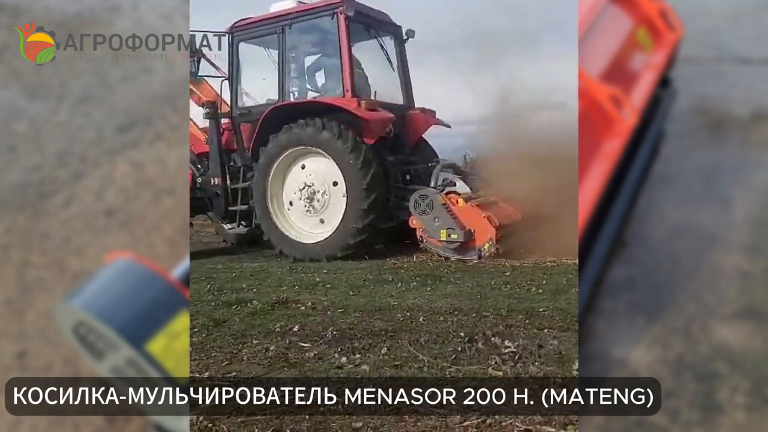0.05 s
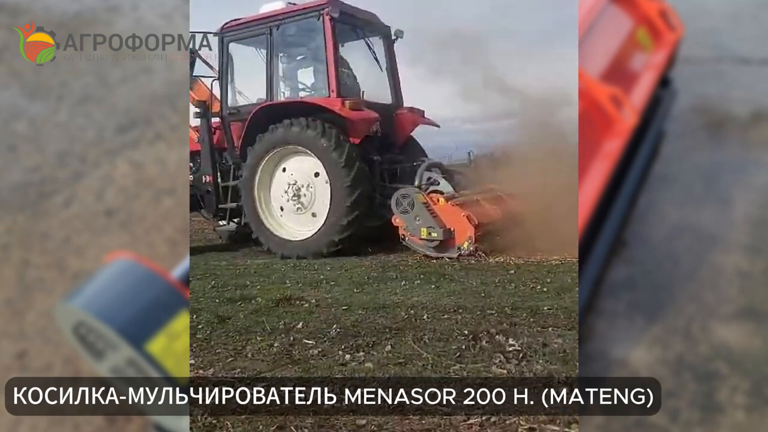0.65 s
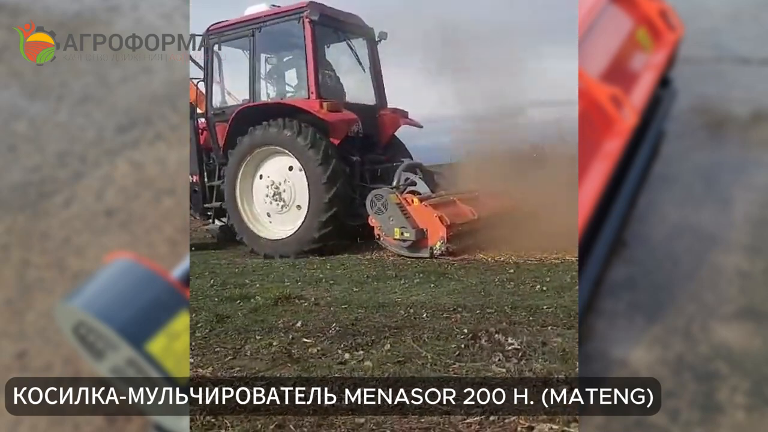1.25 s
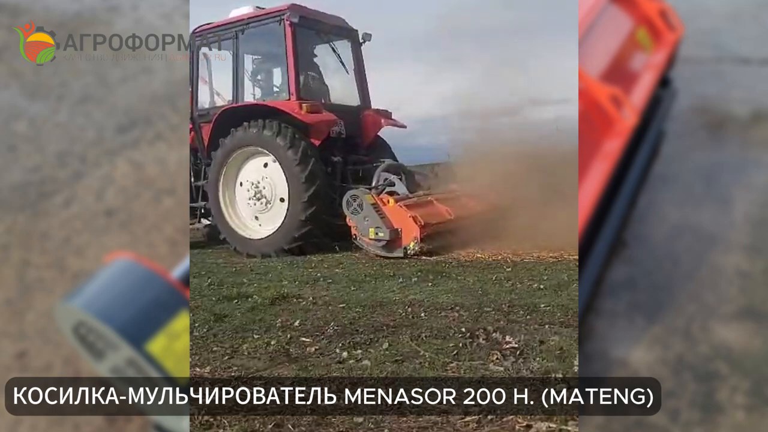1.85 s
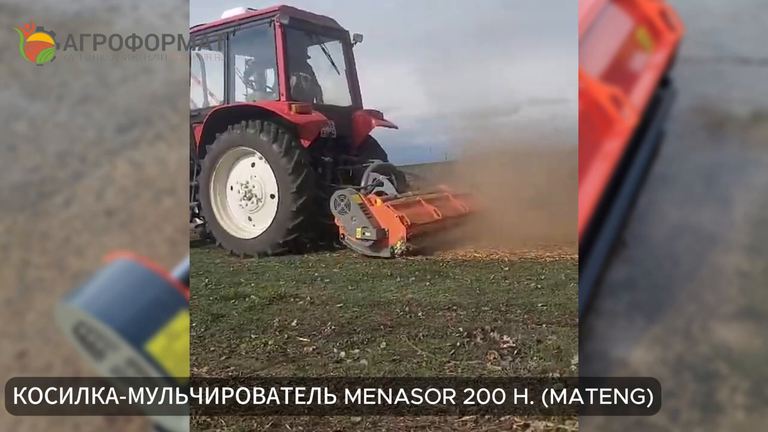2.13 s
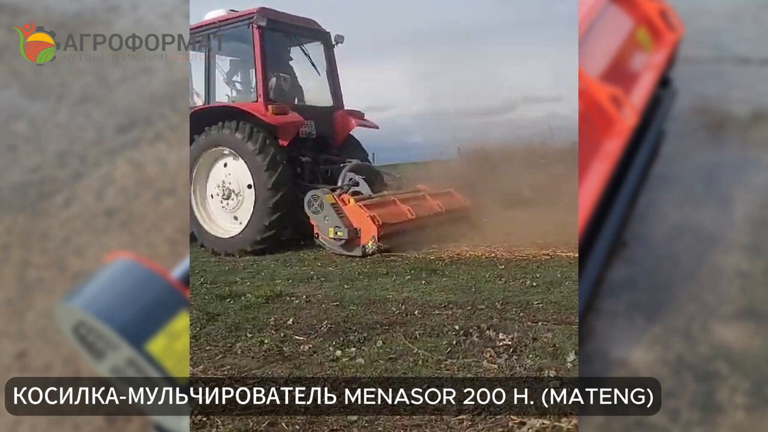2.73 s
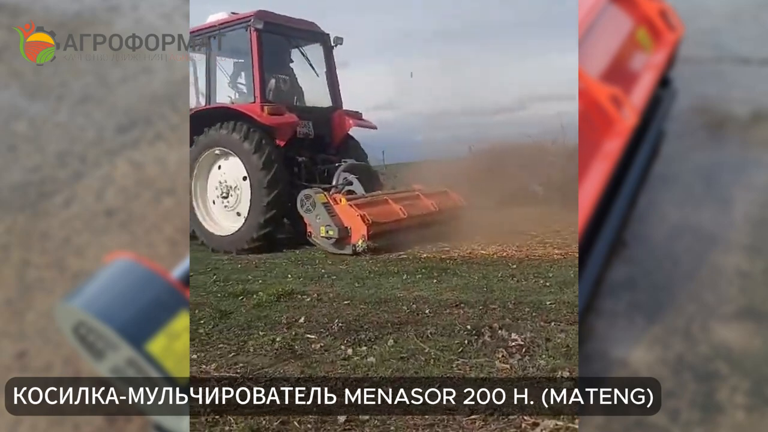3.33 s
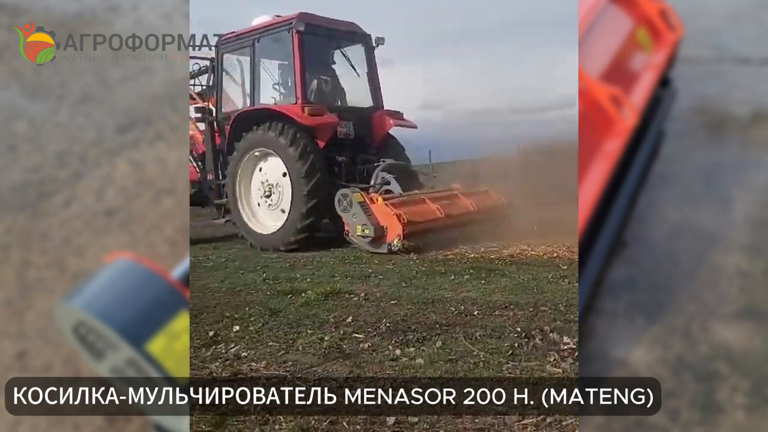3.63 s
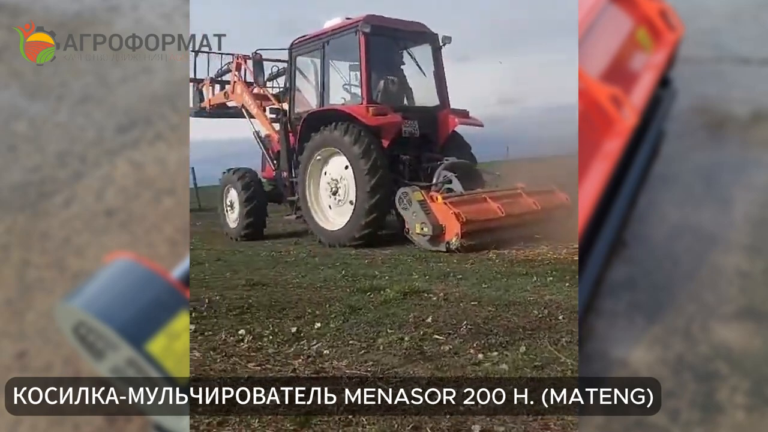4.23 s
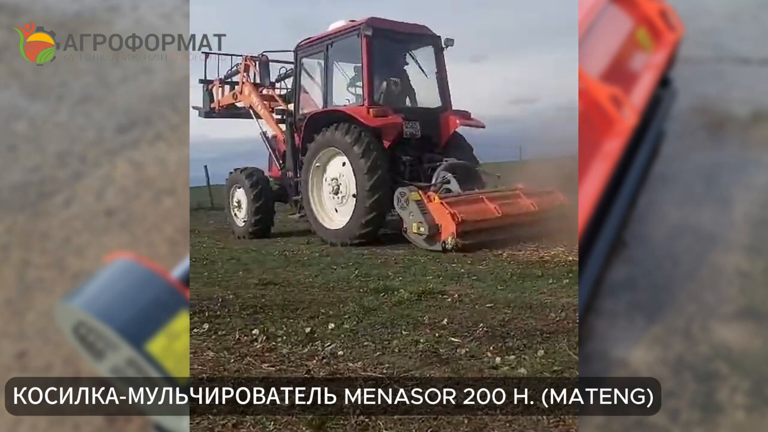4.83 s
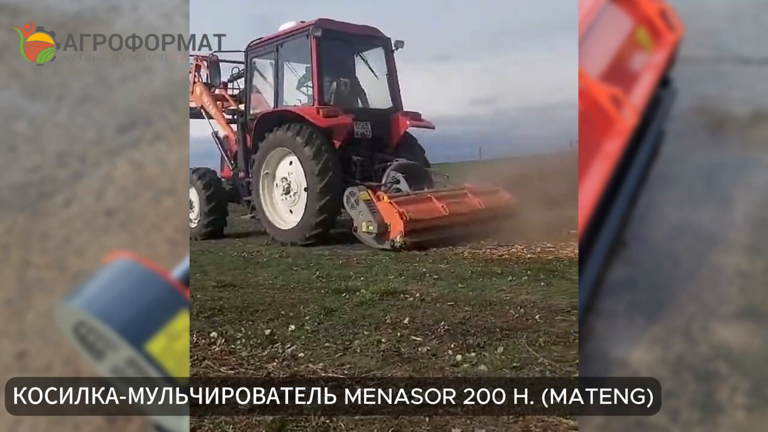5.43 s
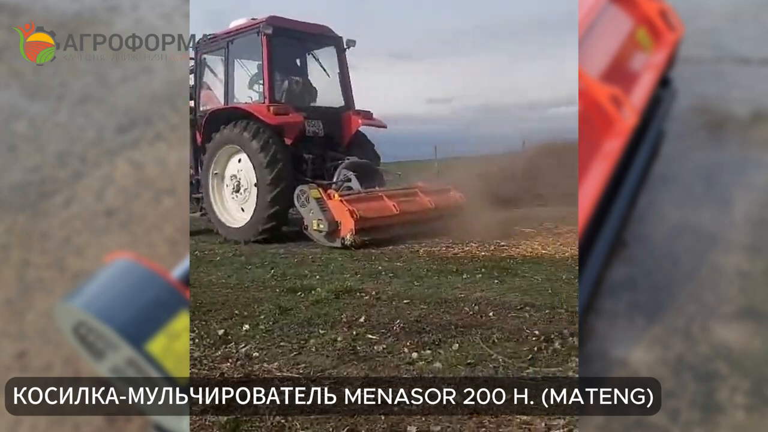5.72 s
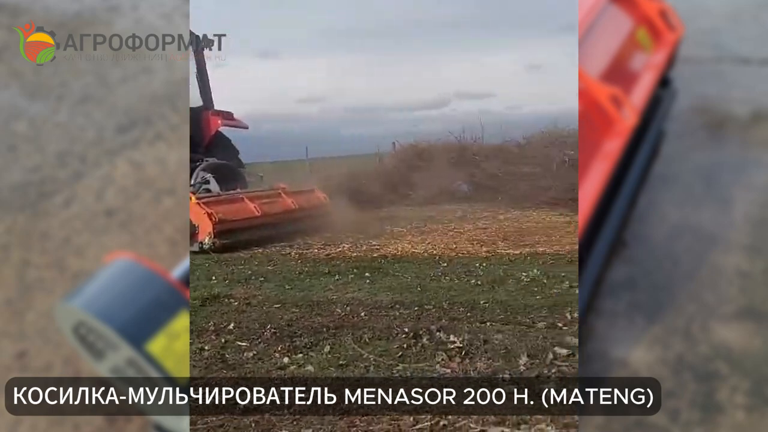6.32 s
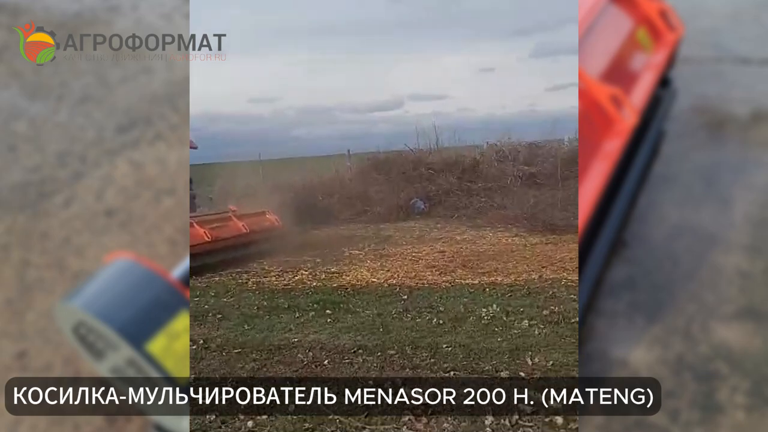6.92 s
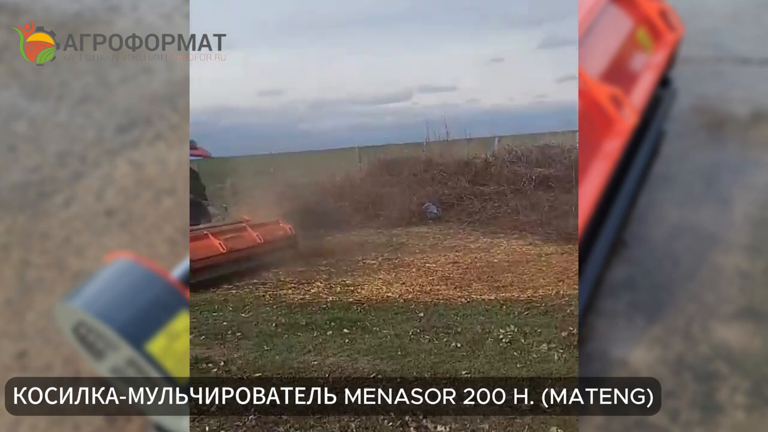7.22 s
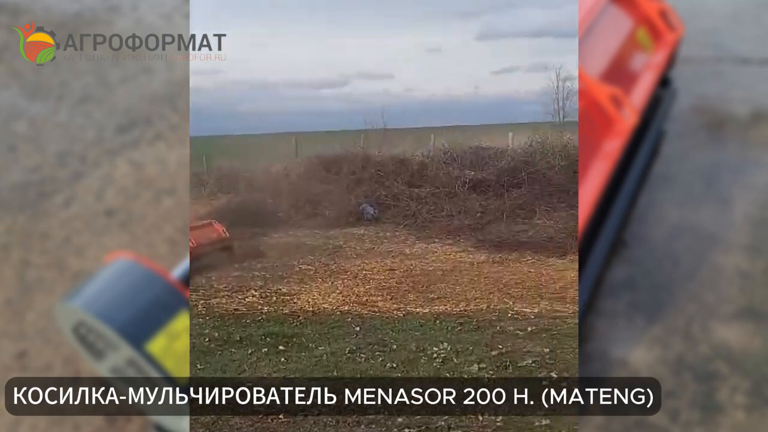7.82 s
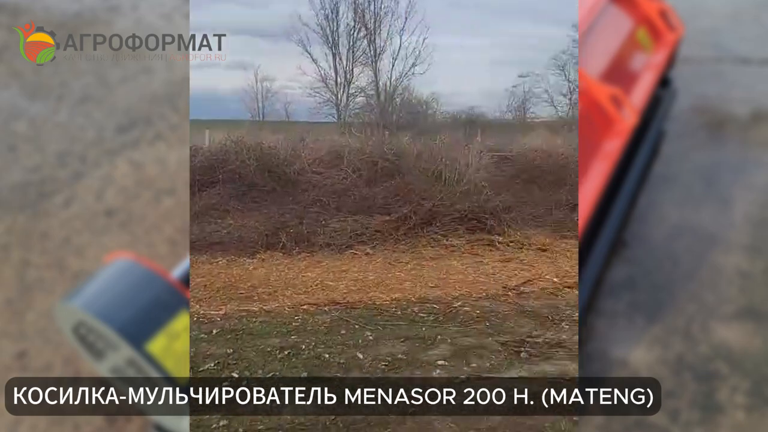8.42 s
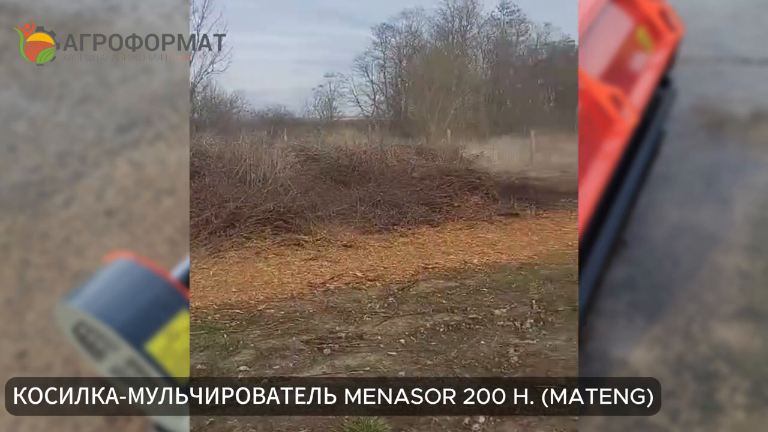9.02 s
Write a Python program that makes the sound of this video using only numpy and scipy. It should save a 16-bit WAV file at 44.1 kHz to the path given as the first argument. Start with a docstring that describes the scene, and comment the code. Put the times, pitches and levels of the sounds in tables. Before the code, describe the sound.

A diesel tractor drones while its mulcher roars and crunches through branches, with snapping sticks and gusty wind on the microphone.

```python
"""An open field, where a diesel tractor creeps past with a flail mulcher behind it.
The exhaust drones and the engine clatters. The mulcher's rotor, a spinning drum of small hammers
called flails, roars and hums; its hum and the drone are so close in pitch that they slowly throb.
Branches crunch against the steel hood, sticks snap and chips spray out, until the brush runs out.
Wind buffets the microphone, which hears through two openings, the left and right ports."""
import sys
import numpy as np
from scipy import signal
from scipy.fft import rfft, irfft, next_fast_len
from scipy.io import wavfile
from scipy.ndimage import uniform_filter1d

SR = 44100
rng = np.random.default_rng(int(sys.argv[2]) if len(sys.argv) > 2 else 0)


def master(y):
    """Save y as 16-bit WAV."""
    cut = np.clip(np.atleast_2d(y).T, -1, 1)
    pcm = np.round(cut * 32767)  # scale
    wavfile.write(sys.argv[1], SR, pcm.astype(np.int16))


N = 399546
TIME = np.arange(N) / SR
FFT_SIZE = 2 * next_fast_len(N // 2 + SR // 10)
BIN_HZ = np.fft.rfftfreq(FFT_SIZE, 1 / SR)

# how loud the passing machine drones: (time [s], level [dB])
DRONE_LEVELS = [(0.2, -35), (3.01, -39), (5.27, -31), (8.2, -29.5), (8.7, -32)]
# the rotor bites into tufts of brush: (start [s], length [s], chip spray [dB], twig crackle [dB])
BRUSH_BITES = [(0, 0.88, -50, -43), (0.844, 0.27, -40, -43.5), (1.273, 0.55, -43.5, -40.5),
               (2.24, 0.5, -41, -41), (3.015, 0.086, -50.5, -40), (3.499, 0.25, -41.5, -45),
               (4.172, 0.093, -49, -47.5), (4.598, 0.11, -40, -48.5), (4.86, 0.52, -44, -50),
               (5.754, 0.5, -51, -69), (6.942, 0.43, -59, -72), (8.048, 0.077, -63, -83)]
# branches breaking: (time [s], peak [dB], note of the wood [Hz], hood thud added to the peak [dB])
BRANCH_BREAKS = [(0.08, -28.5, 1910, -4), (0.19, -27.5, 1886, -6), (0.3428, -30.5, 1945, -28),
                 (0.924, -30, 2110, -11), (1.073, -25.5, 1800, -4), (1.468, -29, 1740, -10),
                 (1.5318, -25, 2150, -6), (1.5914, -26, 1980, 6), (1.7561, -26, 1863, -8),
                 (1.894, -28.5, 2070, 6.5), (2.1365, -28, 1940, -7), (2.172, -26.5, 1900, 3),
                 (2.2378, -22, 1647, 3), (2.2597, -17.5, 2100, 5), (2.287, -24.5, 1766, -6),
                 (2.5122, -22, 1790, 1), (2.6253, -29, 1940, 7.5), (2.711, -23, 1970, -10),
                 (2.8712, -31.5, 2060, -9), (3.5379, -16, 1730, 0.5), (3.6088, -22.5, 2020, -15),
                 (3.633, -20, 1740, 5.5), (4.0248, -22.5, 2000, -29), (4.6652, -36, 2050, 0),
                 (4.742, -23.5, 2020, -14), (4.9054, -25.5, 1470, -6), (5.1896, -28.5, 1590, 2),
                 (6.05, -30.5, 1450, -10)]
# the notes the steel hood rings on: (pitch [Hz], level [dB], time to fade by 60 dB [s])
HOOD_NOTES = [(1500, -1, 0.3), (1700, 6, 0.17), (1796, 4, 0.15), (1917, 0, 0.026), (2046, 5, 0.17),
              (2136, 2.5, 0.07), (2365, 1.5, 0.11), (2943, 1.5, 0.035), (3400, -3, 0.12),
              (4870, -4.5, 0.021)]


def from_db(db):
    """Turn decibels into a number to multiply by."""
    return 10 ** (np.asarray(db) / 20)


def unit_power(x):
    """Scale a signal so that its average power is 1."""
    return x / np.sqrt(np.mean(x ** 2) + 1e-20)


def over_time(rows):
    """Join (time, value) points into a curve with a value at every sample."""
    return np.interp(TIME, *np.transpose(rows))


def over_pitch(rows):
    """Join (frequency, value) points into a curve with a value at every frequency in BIN_HZ."""
    hz, value = np.transpose(rows)
    return np.interp(np.log(BIN_HZ + 1), np.log(hz), value)


def drift(rate):
    """A smooth random wobble, about 1 in size, that changes about rate times a second."""
    pole = np.exp(-40 * np.pi * rate / SR)
    noise = rng.standard_normal(N // 20 + 2002)   # one value for every 20 samples
    slow = signal.lfilter([1], [1, -2 * pole, pole * pole], noise)[2000:]
    return np.interp(np.arange(N) / 20, np.arange(len(slow)), unit_power(slow))


def white():
    """Two unrelated, even hisses."""
    return rng.standard_normal((2, N))


def grains(per_s, spread_db):
    """Tiny random impacts; a few stand out as stronger, or as weaker if the spread is negative."""
    hits = np.flatnonzero(rng.random(N) < per_s / SR)
    noise, sizes = white(), np.zeros(N)
    sizes[hits] = from_db(spread_db * np.minimum(rng.exponential(1, N)[hits], 4))
    return unit_power(sizes * noise)


def bursts(rows, t60, lead_s=0.002, lead_db=0):
    """Loudness curve of blows (time, level): each builds for lead_s, then fades 60 dB in t60 seconds."""
    power = np.zeros(N)
    for start, db in rows:
        span = np.arange(max(0, int((start - lead_s) * SR)), min(N, int((start + t60) * SR)))
        age = span / SR - start
        shape_db = np.where(age < 0, lead_db + 60 * age / lead_s, -60 * age / t60)
        power[span] += from_db(db + shape_db) ** 2
    return np.sqrt(power)


def swells(rows, rise_db_per_s, sag_db_per_s, fall_db_per_s):
    """Loudness curve of events (start, length, level) that rise, sag while they last, then fade."""
    now, power = TIME[::32], 0
    for start, length, db in rows:
        rise = rise_db_per_s * np.maximum(start - now, 0)
        sag = sag_db_per_s * np.clip(now - start, 0, length)
        fall = fall_db_per_s * np.maximum(now - start - length, 0)
        power = power + from_db(db - rise - sag - fall) ** 2
    return np.interp(TIME, now, np.sqrt(power))


def clumps(per_s, t60, bed):
    """Loudness curve of small random breaks, each sudden and then fading, over an even bed."""
    breaks = (rng.random(N) < per_s / SR) * rng.exponential(1, N)
    power = signal.lfilter([1], [1, -from_db(-120 / (t60 * SR))], breaks + 1e-18)
    return unit_power(np.sqrt(power / power.mean() + bed))


def patchy(x, patch_db):
    """Every handful of splinters sounds a bit different: the level wanders over pitch and time."""
    frames = signal.stft(x, nperseg=512)[2]
    patches = uniform_filter1d(rng.standard_normal(frames.shape[1:]), size=5, axis=0)
    patches = unit_power(uniform_filter1d(patches, size=7, axis=1))
    return signal.istft(frames * unit_power(from_db(patch_db * patches)))[1][:, :N]


def ring(force, notes):
    """A pushed or struck object rings on its own notes (pitch, level, fade time)."""
    out = 0
    for hz, db, t60 in notes:
        decay = from_db(-60 / (t60 * SR))
        poles = [1, -2 * decay * np.cos(2 * np.pi * hz / SR), decay ** 2]
        gain = from_db(db) * (1 - decay ** 2) / 2
        out = out + gain * signal.lfilter([1, 0, -1], poles, force + 1e-18)
    return out


def at_ports(pair, tone, likeness=None, lag_ms=None, balance_db=None):
    """Give two signals a tone colour, then mix them: one alike at both ports, the other opposite."""
    # how alike the machine sounds at the two ports: (frequency [Hz], likeness [0-1])
    machine_likeness = [(100, 0.41), (220, 0.43), (350, 0.51), (650, 0.92), (1000, 0.52), (2000, 0.85),
                        (3500, 0.4), (7000, 0.26), (16000, 0.21)]
    # how late it reaches the left port: (frequency [Hz], delay [ms])
    machine_lag = [(80, 1.95), (260, 0.81), (450, 0.052), (750, 0.052), (1000, 0.38), (1700, 0.58),
                   (16000, 0.527)]
    # how much louder it is on the left: (frequency [Hz], left minus right [dB])
    machine_balance = [(100, 7), (200, -0.5), (380, -5), (750, 3), (1300, -5.5), (2000, -4), (3500, -6.5),
                       (5500, -4), (7300, -5.5), (8200, -12), (9500, -13), (13000, -2.5)]
    common, opposite = rfft(pair, FFT_SIZE) * unit_power(from_db(over_pitch(tone)))
    alike = over_pitch(likeness or machine_likeness)
    common, opposite = common * np.sqrt((1 + alike) / 2), opposite * np.sqrt((1 - alike) / 2)
    tilt = from_db(over_pitch(balance_db or machine_balance) / 2)
    delay = np.exp(-2j * np.pi * BIN_HZ * over_pitch(lag_ms or machine_lag) / 1000)
    return irfft([(common + opposite) * tilt * delay, (common - opposite) / tilt])[:, :N]


def port_phases(phase, lag_rad=0.11):
    """A low tone reaches the left port a little later than the right."""
    return phase - np.array([[lag_rad], [0]])


def over_ground(x):
    """An echo off the ground cancels some pitches, which shift as the machine moves; the bass stays."""
    # the lowest pitch that the echo cancels: (time [s], pitch [Hz])
    cancelled_pitch = [(0, 1270), (3.2, 1170), (4, 1110), (4.8, 956), (6, 1024), (7, 1370), (7.6, 1030),
                       (8.3, 1310), (9.06, 1420)]
    samples = np.arange(N)
    earlier = samples - SR / (2 * over_time(cancelled_pitch))   # half a wave of that pitch
    echo = np.array([np.interp(earlier, samples, side) for side in np.atleast_2d(x)])
    return (x + echo) / 2


def exhaust(phase, waver_db=1.5, roughness=0.38):
    """The engine's firings leave the exhaust as a low drone that throbs unevenly."""
    # the exhaust's tones: (multiple of the firing rate, level [dB])
    harmonics = [(1, -5), (2, 2)]
    tones = sum(from_db(db + waver_db * drift(14)) * np.sin(round(multiple) * port_phases(phase))
                for multiple, db in harmonics)
    drone = from_db(over_time(DRONE_LEVELS)) * unit_power(tones * (1 + roughness * drift(21)))
    return over_ground(drone * from_db([[1.0], [-1.0]]))   # a little louder on the left


def engine_clatter(phase, knock=0.071):
    """The engine rattles with countless tiny impacts, a little louder at every firing."""
    # how loud the clatter is: (time [s], level [dB])
    levels = [(0, -39), (4, -46.5), (5.6, -42), (6.6, -43.5), (7.7, -42), (8.2, -44), (8.6, -50.5),
              (9.06, -51.5)]
    # its tone colour: (frequency [Hz], level [dB])
    tone = [(500, 0), (1100, -2), (1400, -1), (1800, 2.5), (2400, -4.5), (3300, -15.5), (3650, -16.5),
            (4050, -32), (5700, -24.5), (7000, -28), (9300, -28.5), (12000, -35.5)]
    rattle = grains(18000, spread_db=1.5) * (1 + knock * np.cos(phase))
    return from_db(over_time(levels)) * at_ports(rattle, tone)


def rotor_hum(phase, level_db=-2.5, trend_db_per_s=-0.23, waver_db=2.5, beat_hz=2.38, swell_s=5.36):
    """The rotor hums just above the exhaust's second tone, so together they swell and sink: a beat."""
    beat = 2 * np.pi * beat_hz * (TIME - swell_s)
    hum = np.sqrt(2) * np.sin(2 * port_phases(phase) + beat + 0.28 * drift(18))
    hum_db = over_time(DRONE_LEVELS) + level_db + trend_db_per_s * TIME + waver_db * drift(8.7)
    return from_db(hum_db) * hum * from_db([[-0.5], [0.5]])   # a little louder on the right


def rotor_roar(phase, level_db=3.0, flutter_db=1.7, throb=0.19):
    """Flails churn air and soil inside the hollow housing, pulsing with the engine; two clods knock."""
    # how loud the roar is: (time [s], level [dB])
    levels = [(0, -31), (1, -32), (2.4, -32), (3.3, -33), (4.2, -33), (4.9, -30), (5.7, -31), (6.8, -34.5),
              (7.7, -32.5), (8.3, -32), (8.65, -33.5), (9.06, -32.5)]
    # its tone colour: (frequency [Hz], level [dB])
    tone = [(60, -3.5), (150, -5), (230, -3.5), (330, 0.5), (450, -2.5), (600, -3.5), (800, 2), (950, 2),
            (1150, -2), (1500, -36), (4000, -78)]
    # the notes of the hollow housing: (pitch [Hz], level [dB], time to fade by 60 dB [s])
    housing_notes = [(240, -5.5, 0.045), (314, -6, 0.023), (417, -3.5, 0.047), (488.6, 1, 0.11)]
    # lumps of soil hitting the housing: (time [s], peak [dB])
    clods = [(8.871, -22), (8.925, -19)]
    churn = grains(5000, spread_db=2.5) * from_db(flutter_db * drift(31)) * (1 + throb * np.cos(phase))
    force = from_db(over_time(levels)) * churn + bursts(clods, t60=0.035) * white()
    roar = at_ports(force + ring(force, housing_notes), tone)
    return from_db(level_db) * over_ground(roar)


def engine_whirr(speed, cycle_hz=12.6, level_db=-1.5, waver_db=2.5):
    """The engine sings on multiples of the rate at which its four-stroke cycle repeats."""
    # the whirr's tones: (multiple of the cycle rate, level [dB])
    harmonics = [(25, -12.5), (40, -15.5), (51, -17), (53, -17.5), (56, -10), (57, -15.5), (63, -10),
                 (72, -15)]
    cycles = np.cumsum(cycle_hz * speed) / SR
    tones = sum(from_db(db + waver_db * drift(5.5)) * np.sin(2 * np.pi * round(multiple) * cycles)
                for multiple, db in harmonics)
    return from_db(over_time(DRONE_LEVELS) + level_db) * np.sqrt(2) * over_ground(tones)


def biting(rows):
    """Loudness curve of bites of brush: each flares up, thins as it is chewed, then clears out."""
    return swells(rows, rise_db_per_s=214, sag_db_per_s=9, fall_db_per_s=46.5)


def shredding(twig_db=4.5, crunch_db=-4, crack_db=-9, thud_db=-7.5, hood_db=1, knock_db=-8.5):
    """Twigs break in clumps, thick branches in loud bursts; the splinters ring the steel hood."""
    # tone colour of the shredding: (frequency [Hz], level [dB])
    shred_tone = [(300, 4.5), (700, 2), (1000, -2), (1350, -3), (1900, -0.5), (2500, 2), (3100, -7),
                  (4300, -9), (5600, -14.5), (7000, -26), (8500, -30), (16000, -17)]
    # tone colour of a thud on the hood: (frequency [Hz], level [dB])
    thud_tone = [(100, -30), (300, -21), (630, 0.5), (850, -7), (1300, -26), (3000, -78)]
    twig_bites = [(start, length, twig) for start, length, _, twig in BRUSH_BITES]
    twigs = from_db(twig_db) * biting(twig_bites) * clumps(per_s=85, t60=0.092, bed=0.53)
    blows = [(start, db) for start, db, _, _ in BRANCH_BREAKS]
    # wood splinters before it gives way, so each crunch has a lead-in
    branches = from_db(crunch_db) * bursts(blows, t60=0.26, lead_s=0.17, lead_db=-6)
    cracks = from_db(crack_db) * bursts(blows, t60=0.034) * white()
    hood_blows = [(start, db + thud + thud_db) for start, db, _, thud in BRANCH_BREAKS]
    thuds = bursts(hood_blows, t60=0.14, lead_s=0.032) * white()
    splinters = patchy(np.hypot(twigs, branches) * grains(8000, spread_db=2), patch_db=3)
    ringing = from_db(hood_db) * ring(splinters + from_db(10) * cracks, HOOD_NOTES)   # cracks clank
    knocks = from_db(knock_db) * twigs * hood_knocks(per_s=60)
    return at_ports(splinters + cracks + ringing + knocks, shred_tone) + at_ports(thuds, thud_tone)


def hood_knocks(per_s):
    """Loose pieces hit the hood at random; each blow brings out a different mix of its notes."""
    hits, out = rng.integers(0, N, int(per_s * N / SR)), 0
    for note in HOOD_NOTES:
        clicks = np.zeros(N)
        clicks[hits] = rng.standard_normal(len(hits))
        out = out + ring(clicks, [note])
    return np.array([unit_power(out), np.zeros(N)])


def chips(spray_db=5.0, flicker_db=1.9):
    """Fine chips hiss and tick out from under the hood with every bite; now and then one snaps."""
    # fine dust that never stops, fainter as the machine moves away: (time [s], level [dB])
    dust_levels = [(0, -40), (3.3, -56), (4.5, -62), (7.8, -71), (9.06, -88)]
    # single chips snapping: (time [s], peak [dB])
    chip_snaps = [(1.6197, -27), (1.8277, -27), (2.8587, -36), (3.0839, -26), (4.266, -27.5), (4.32, -27.5),
                  (4.7386, -25), (4.75, -22.5), (4.9631, -35), (5.1153, -40), (5.237, -27), (5.2982, -31),
                  (5.3787, -28.5), (6.3824, -39)]
    # tone colour of the spray: (frequency [Hz], level [dB])
    tone = [(2000, 9), (5000, 3), (6500, -3), (8200, -17), (10000, -5.5), (12350, -0.5), (12620, 8),
            (12850, -5), (14200, 6), (16000, -4)]
    spray_bites = [(start, length, spray) for start, length, spray, _ in BRUSH_BITES]
    flow = np.hypot(biting(spray_bites), from_db(over_time(dust_levels)))
    flow *= from_db(spray_db + flicker_db * drift(29))
    hiss = flow * clumps(per_s=70, t60=0.017, bed=3) * grains(22000, spread_db=2)
    snaps = bursts(chip_snaps, t60=0.022) * white()
    return at_ports(patchy(hiss, patch_db=2.5) + snaps, tone)


def wind(level_db=9.0, flutter_db=5.0, surge_db=4.0):
    """Swirls of air rumble on the microphone; the small ones differ more between the two ports."""
    # how hard the wind blows: (time [s], level [dB])
    levels = [(0.0, -38.5), (2.75, -35.5), (3.5, -46), (4.06, -43.5), (4.62, -46.5), (5.83, -33),
              (6.38, -38.5), (6.91, -37), (7.47, -43.5), (8.0, -36.5), (8.17, -32), (9.06, -34)]
    # tone colour of the rumble: (frequency [Hz], level [dB])
    tone = [(15, -36), (30, -26), (45, -6), (70, 1), (100, 1), (140, -3.5), (200, -12.5), (350, -17.5),
            (800, -27), (2500, -106)]
    swirls = at_ports(white(), tone, likeness=[(90, 0.6), (250, 0.41)],
                      lag_ms=[(100, 0.86)], balance_db=[(100, 0.71)])
    swirls /= np.sqrt(uniform_filter1d(np.mean(swirls ** 2, axis=0), size=SR // 7))   # even them out
    gusts_db = flutter_db * np.tanh(drift(32.4)) + surge_db * np.tanh(drift(11.2))
    return from_db(over_time(levels) + level_db + gusts_db) * swirls


def breeze(level_db=-64.0):
    """A faint, even hiss from the dry field."""
    # tone colour of the hiss: (frequency [Hz], level [dB])
    tone = [(1000, 3.5), (5300, 6), (6600, -33.5), (16000, -49)]
    return from_db(level_db) * at_ports(white(), tone, likeness=[(1000, 0)])


def wood_notes(level_db=-2.0, t60=0.13, scatter=0.0247):
    """Each breaking branch rings briefly on tones of its own; the higher ones die sooner."""
    # the tones of a branch: (multiple of its note, level [dB])
    branch_tones = [(1.001, 0.5), (1.061, -4), (1.701, -20), (2.2, -19), (2.7, -20)]
    out, age = np.zeros(N), np.arange(int(t60 * SR)) / SR
    for start, db, hz, _ in BRANCH_BREAKS:
        for ratio, tone_db in branch_tones:
            pitch = hz * ratio * (1 + scatter * rng.standard_normal())
            fading = from_db(db + level_db + tone_db - 60 * age * np.sqrt(ratio) / t60)
            out[int(start * SR):][:len(age)] += fading * np.sin(2 * np.pi * (pitch * age + rng.random()))
    return at_ports(np.array([out, np.zeros(N)]), tone=[(1000, 0)])


def sticks(level_db=-11.0, t60=0.14, note_hz=3450, note_db=-6.5, scatter=0.066):
    """A dry stick gives way at once, with a bright crack, its own note and a short tail of splinters."""
    # sticks snapping clear of the hood: (time [s], peak [dB])
    snaps = [(0.0812, -24), (0.182, -25), (0.339, -23.5), (0.413, -22.5), (0.486, -25), (0.844, -27),
             (0.928, -27), (1.883, -26.5), (2.697, -26.5), (3.025, -30.5), (4.602, -26), (4.6668, -20.5),
             (4.744, -19.5), (4.906, -18), (4.976, -23), (5.1904, -21), (5.3787, -34), (6.0255, -21.5),
             (6.9671, -34.5), (7.3164, -32.5)]
    # tone colour of the crack: (frequency [Hz], level [dB])
    tone = [(1200, -15), (2600, -0.5), (3600, 3), (5400, -5.5), (7000, -19.5), (16000, -32)]
    notes = 0
    for snap in snaps:
        pitch = note_hz * (1 + scatter * rng.standard_normal())
        notes = notes + bursts([snap], t60) * np.sin(2 * np.pi * pitch * TIME)
    splinters = at_ports(bursts(snaps, t60) * grains(6000, spread_db=-2.5), tone)
    return from_db(level_db) * (splinters + from_db(note_db) * notes)


def buffets(thump_hz=88, scatter=0.16, width_s=0.0077, skew=0.51):
    """A big swirl of wind rocks the air pressure for a few uneven, lopsided waves: a short thump."""
    # swirls hitting the microphone: (time [s], peak [dB])
    thumps = [(0.389, -16), (0.694, -11), (0.758, -16.5), (2.19, -16), (2.52, -17), (5.383, -15),
              (5.744, -12), (7.039, -17.5), (8.209, -16), (8.387, -16), (8.486, -9), (8.547, -17),
              (8.72, -15.5), (8.796, -13), (8.975, -9.5)]
    push = sum(from_db(db) / (1 + ((TIME - moment) / width_s) ** 2) for moment, db in thumps)
    pitch = thump_hz * np.exp(scatter * drift(30.56))
    phase = port_phases(2 * np.pi * np.cumsum(pitch) / SR)
    return push * np.sin(phase + skew * np.sin(phase))


def growls(level_db=-13.5, t60=0.012):
    """Now and then the roar swells up around one pitch and sinks back."""
    # the swells of the roar: (start [s], length [s], level [dB], pitch [Hz])
    events = [(4.65, 0.79, -36.5, 633), (6.3, .33, -46.5, 1334), (7.45, 0.73, -35, 634),
              (8.305, 0.77, -48.5, 1230)]
    # their tone colour, with no treble: (frequency [Hz], level [dB])
    tone = [(1500, -2), (4000, -59)]
    out = 0
    for start, length, db, hz in events:
        note = [(hz, 0, t60)]
        band = unit_power(ring(ring(white(), note), note))
        swell = swells([(start, length, db)], rise_db_per_s=22, sag_db_per_s=1.5, fall_db_per_s=24)
        out = out + band * swell
    return from_db(level_db) * at_ports(out, tone)


def scene(firing_hz=50.55, wobble=0.0015):
    """Tractor, mulcher and wind in the open field."""
    speed = 1 + wobble * drift(3.93)   # the engine's governor holds its speed almost steady
    phase = 2 * np.pi * np.cumsum(firing_hz * speed) / SR   # one turn per firing
    machine = exhaust(phase) + engine_clatter(phase) + rotor_hum(phase) + rotor_roar(phase)
    machine += engine_whirr(speed) + growls()
    brush = shredding() + wood_notes() + sticks() + chips()
    return machine + brush + wind() + buffets() + breeze()


def record(dry, bass_cut_hz=32, treble_cut_hz=16000):
    """The microphone loses the deepest bass, and the highest treble is cut steeply."""
    bass_cut = signal.butter(2, bass_cut_hz, "high", fs=SR, output="sos")
    treble_cut = signal.ellip(10, 0.1, 70, treble_cut_hz, fs=SR, output="sos")
    return signal.sosfilt(treble_cut, signal.sosfilt(bass_cut, dry))


dry = scene()
out = record(dry)
master(out)
```